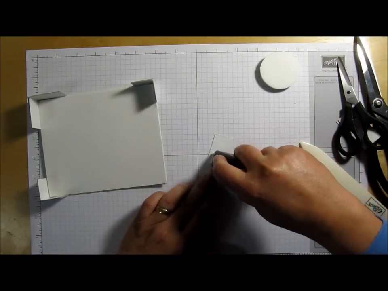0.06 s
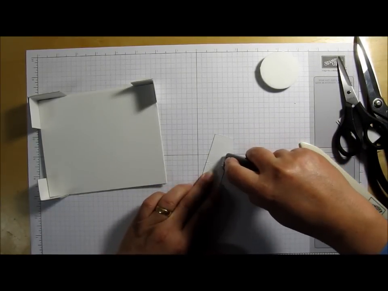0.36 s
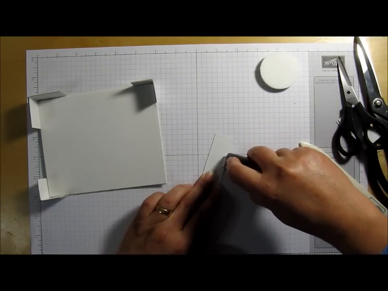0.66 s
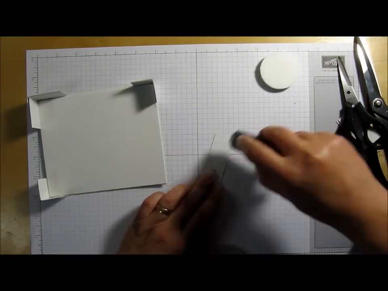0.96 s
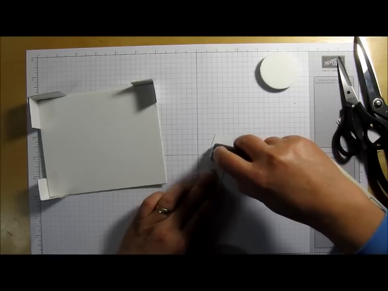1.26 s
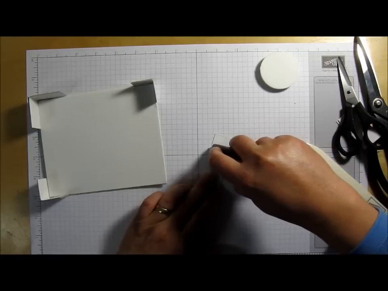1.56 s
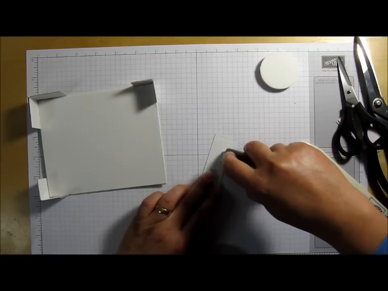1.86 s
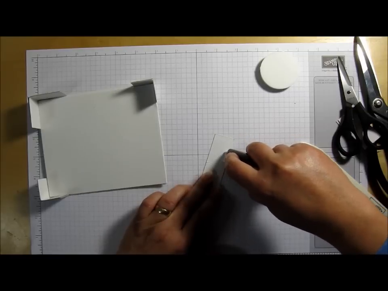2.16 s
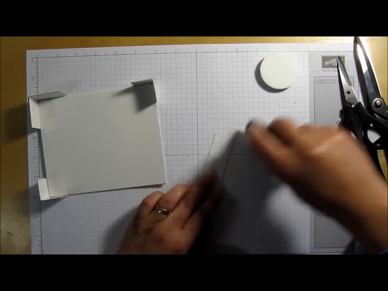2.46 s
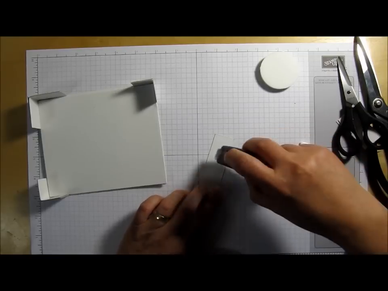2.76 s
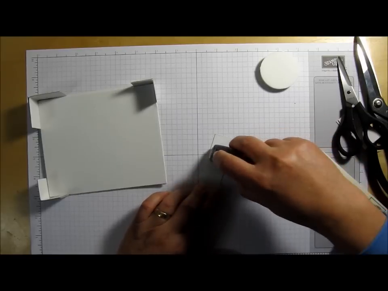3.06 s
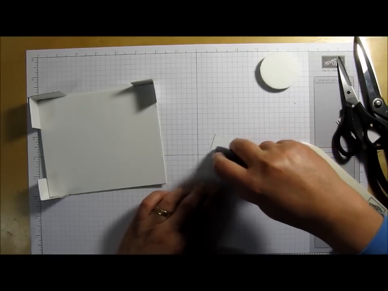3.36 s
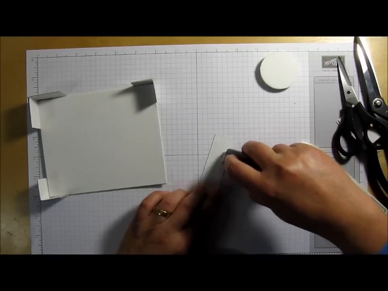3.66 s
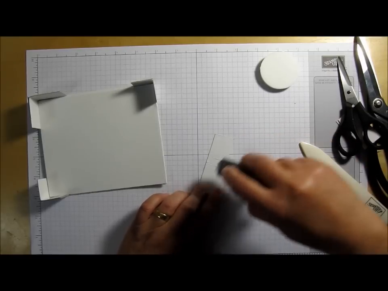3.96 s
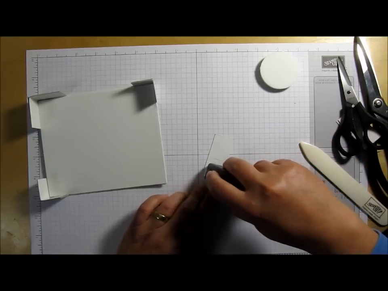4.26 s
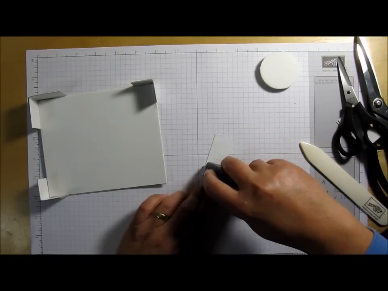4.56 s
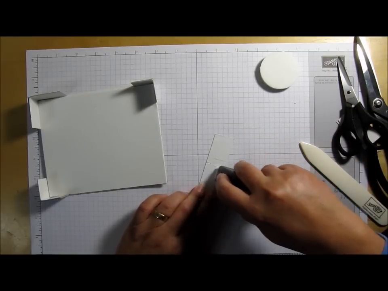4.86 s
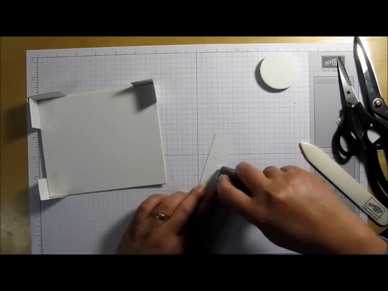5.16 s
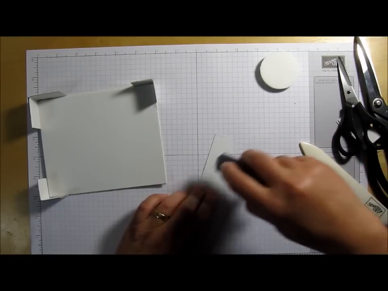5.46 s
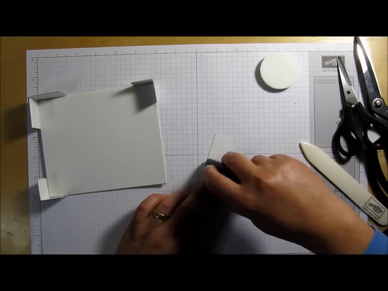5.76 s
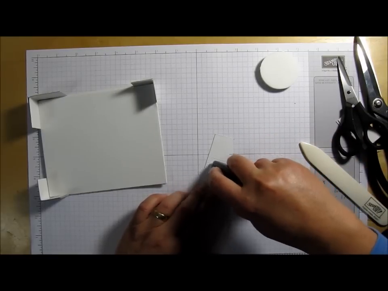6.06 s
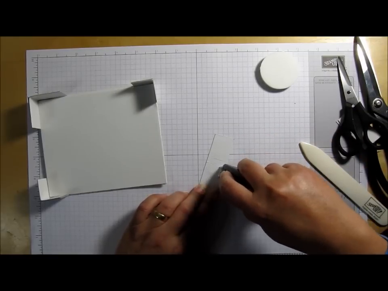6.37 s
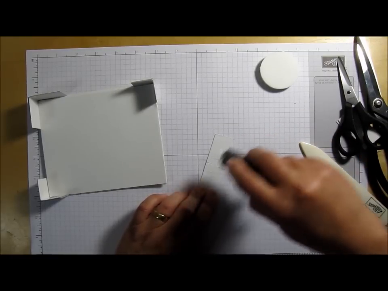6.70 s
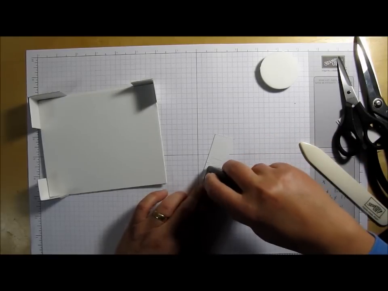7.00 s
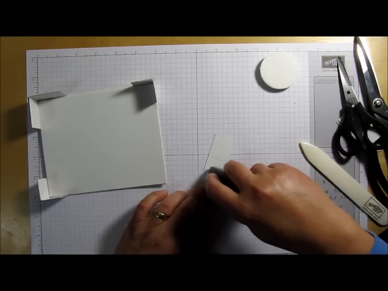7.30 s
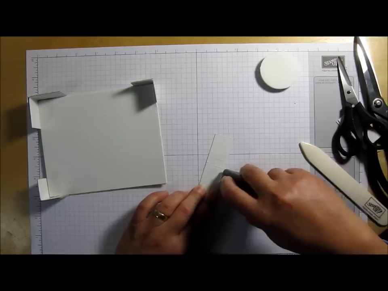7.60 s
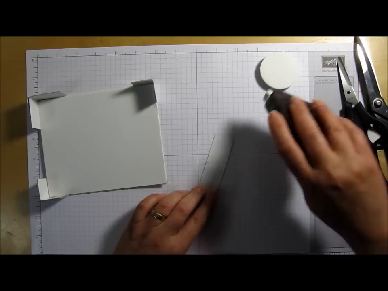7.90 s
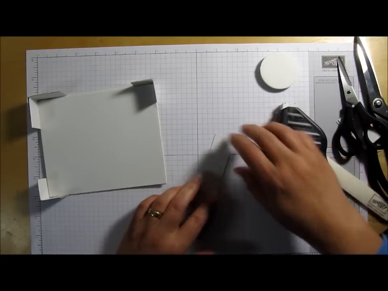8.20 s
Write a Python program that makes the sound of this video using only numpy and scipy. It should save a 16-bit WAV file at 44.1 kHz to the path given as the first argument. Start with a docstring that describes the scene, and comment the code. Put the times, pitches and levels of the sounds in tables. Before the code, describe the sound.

Close, dry plastic clicks and hollow snaps come from a tape runner drawn over card in short, faintly crackling strokes. Dull desk thumps mark the presses, and the ratcheting of the gears grows busier in the second half, after something creaks briefly on the mat. Finally the runner knocks down among tools with a short rattle. A small room with faint rumble and hiss lies underneath.

```python
"""In a small, quiet room a plastic tape runner is drawn over folded cardstock: glue crackles off the
roller, the gears tick, and the hollow shell knocks as the tape snaps. Again and again it is pressed down,
thumping the desk through the mat, drawn along and snapped off. Near 3 s hard tools are jostled; just
after 4 s something dragged on the mat creaks by stick-slip. At 8.1 s the runner is put down, and it
clatters against the tools. Each contact is a brief force filtered by the resonances of the struck body."""
import sys
import numpy as np
from scipy import signal
from scipy.fft import rfft, irfft
from scipy.io import wavfile
from scipy.ndimage import uniform_filter1d

SR = 44100
rng = np.random.default_rng(int(sys.argv[2]) if len(sys.argv) > 2 else 0)


def dump(signal):
    """Clip the signal to [-1, 1] and save it as 16-bit WAV at the path in sys.argv[1]."""
    limited = np.clip(np.atleast_2d(signal).T, -1, 1)
    pcm = np.round(limited * 32767).astype(np.int16)
    wavfile.write(sys.argv[1], SR, pcm)


N = 367838
SIZE = 24576  # samples in one event
HZ = np.fft.rfftfreq(SIZE, 1 / SR)
T = np.arange(SIZE) / SR

# low, mid and treble bands: lower f/Hz, upper f/Hz
BANDS = [(300, 1200), (1200, 4500), (4500, 16000)]
# gear resonances: f/Hz, width/Hz, height/dB
GEAR_MODES = [(610, 65, 11.5), (1980, 190, 13.5), (2390, 100, 10), (3197, 134, 9.5), (3594, 110, 8.5),
              (5100, 230, 5), (6510, 770, 5), (7970, 110, 9), (11950, 4500, 4.5)]
# presses into the desk: t/s, weight/dB, tilt per band/dB, click of the tip/dB
PRESSES = [(1.45, -42.5, -13, -83), (1.558, -39, 1.5, -58), (1.604, -38, -1, -57),
           (2.836, -33.5, -2.5, -40.5), (2.926, -43, 2, -45), (3.223, -36, -4.5, -48.5),
           (3.292, -40.5, -1.5, -63), (3.325, -47, 2.5, -62), (3.342, -38.5, 1, -65),
           (3.814, -39.5, -3, -43), (4.419, -42.5, -9, -62), (5.872, -39, -15, -75),
           (6.013, -37, -2, -54.5), (7.11, -36, -12.5, -54.5), (7.256, -37, 0.5, -46),
           (7.325, -39, -2, -55), (7.465, -35, -10.5, -51), (7.657, -37, 2.5, -43), (8.147, -30.5, 5, -60),
           (8.166, -33.5, 0.5, -60)]
# strokes over the card: start t/s, end t/s, crackle/dB, treble re crackle/dB, ratchet/dB
STROKES = [(0.061, 0.419, -63, -4, -64), (1.777, 2.028, -58.5, -4, -57.5), (2.521, 2.716, -64, -1, -61.5),
           (2.739, 2.827, -59.5, -3, -68), (3.441, 3.687, -59, -4.5, -58), (3.806, 3.906, -58.5, -7, -56),
           (4.899, 5.059, -59.5, 4, -43.5), (5.336, 5.534, -62.5, 1, -63),
           (6.081, 6.473, -63.5, 1.5, -51.5), (6.554, 6.688, -60.5, -14, -61), (7.387, 7.58, -58, 2, -48),
           (7.746, 7.774, -58, 10.5, -65), (7.88, 8.058, -62.5, -7.5, -77)]
# tape tears: t/s, mid level/dB, low re mid/dB, treble re mid/dB, rattle/s, desk recoil/dB, spool tick/dB
SNAPS = [(0.8883, -27, -1, -8.5, 0.0048, -49, -48), (2.5574, -36, 3.5, -7, 0.008, -38, -58.5),
         (3.8597, -34.5, -2.5, -6, 0.007, -38.5, -53.5), (5.3943, -34.5, -2.5, -8, 0.017, -37, -58.5),
         (6.6754, -26.5, -0.5, -9, 0.0055, -37, -54), (7.771, -25.5, 0.5, -5.5, 0.0028, -57, -68)]


def amp(db):
    """Amplitude ratio of a level in decibels."""
    return 10 ** (np.asarray(db) / 20)


def unit(x):
    """Normalisation to a mean energy of 1 per channel."""
    return x / np.sqrt(np.sum(np.atleast_2d(x) ** 2, axis=1).mean() + 1e-20)


def curve(points, hz):
    """Interpolation of (f/Hz, value) points on a logarithmic frequency axis."""
    f, value = np.transpose(points)
    return np.interp(np.log(hz + 1), np.log(f + 1), value)


def add(mix, t, sound):
    """Superposition: a stereo sound joins the mix at time t."""
    part = mix[:, max(0, round(t * SR)):][:, :sound.shape[1]]
    part += sound[:, :part.shape[1]]


def waveform(spectrum):
    """Inverse Fourier transform, faded over its last tenth."""
    return irfft(spectrum) * np.minimum(10 * (1 - T / T[-1]), 1)


def minimum_phase(db):
    """Causality: the phase follows from the log gain by a Hilbert transform."""
    log_gain = np.log(amp(np.r_[db, db[-2:0:-1]]))
    return np.exp(np.conj(signal.hilbert(log_gain)))[:len(db)]


def body(colour, modes):
    """Resonance: Lorentzian peaks stand on a smooth frequency response."""
    peaks = sum(amp(db) ** 2 / (1 + (2 * (HZ - hz) / width) ** 2) for hz, width, db in modes)
    return minimum_phase(curve(colour, HZ) + 10 * np.log10(1 + peaks))


def stereo(spectra, coherence, hz):
    """Partial coherence: two independent spectra mix as mid and side at two close microphones."""
    # channel balance: f/Hz, right re left/dB
    balance = [(100, 1.8), (600, 0.9), (1200, 1.4), (2300, 2.5), (4500, -0.2), (14000, 0)]
    alike = np.clip(curve(coherence, hz), -1, 1)
    mid, side = spectra[0] * np.sqrt((1 + alike) / 2), spectra[1] * np.sqrt((1 - alike) / 2)
    lean = amp(curve(balance, hz) / 2)
    return np.array([(mid + side) / lean, (mid - side) * lean])


def equalise(spectrum, bands, levels_db, seconds):
    """Spectral shaping: a waveform whose band energies, spread over `seconds`, approach levels_db."""
    centres = np.sqrt(np.prod(bands, axis=1))
    for _ in range(2):
        power = abs(spectrum.mean(0)) ** 2 * 2 / (SIZE * SR * seconds)
        band_power = np.array([power[(HZ > lo) & (HZ < hi)].sum() for lo, hi in bands])
        change_db = levels_db - 10 * np.log10(band_power + 1e-20)
        # a soft contact keeps falling above the last band
        top_db = change_db[-1] + 0.55 * min(change_db[-1] - change_db[-2], 1)
        tilt = np.c_[np.r_[centres, 2 * centres[-1]], np.r_[change_db, top_db]]
        spectrum = spectrum * minimum_phase(curve(tilt, HZ))
    return waveform(spectrum)


def room_noise():
    """Ambient noise: a steady low rumble and faint hiss, less coherent towards the treble."""
    # noise spectrum: f/Hz, relative density/dB
    density = [(8.8, -42), (15, -0.5), (32, -2.5), (49, -14.5), (101, -14.5), (157, -25), (204, -19),
               (237, -32.5), (282, -22), (479, -32.5), (523, -29), (968, -33.5), (7770, -43.5),
               (15300, -51.5), (16700, -75)]
    # likeness of left and right: f/Hz, coherence
    coherence = [(50, 0.95), (300, 0.46), (1000, 0.17), (3000, 0.18), (12000, 0.088)]
    hz = np.fft.rfftfreq(N, 1 / SR)
    white = stereo(rfft(rng.standard_normal((2, N))), coherence, hz)
    return amp(-52.5) * np.sqrt(N) * unit(irfft(white * amp(curve(density, hz)), N))


def room_tails(count=12):
    """Reverberation: diffuse noise decays exponentially, the treble first."""
    # reverberation time: f/Hz, T60/s
    t60 = [(100, 0.35), (500, 0.16), (2000, 0.13), (6000, 0.12), (15000, 0.088)]
    hz, t, noise = signal.stft(rng.standard_normal((count, 2, SIZE)), SR, nperseg=256)
    decay = amp(-60 * t / curve(t60, hz)[:, None])
    tails = signal.istft(noise * decay, SR, nperseg=256)[1][..., :SIZE]
    return [unit(tail * (1 - np.exp(-T / 0.0019))) for tail in tails]


def contact(tails, ring_s, room_db, crack):
    """Impulse response of one contact, as a spectrum: a crack, dense decaying modes, then the room."""
    # likeness of left and right: f/Hz, coherence
    coherence = [(100, 0.98), (600, 0.98), (1200, 0.86), (2200, 0.61), (4500, 0.39), (8000, 0.46),
                 (14000, 0.35)]
    edge_noise, ring_noise = rng.standard_normal((2, 2, SIZE))
    edge = unit(edge_noise * np.exp(-T / 0.00083))
    edge[0] = T == 0  # head on, the crack is a single impulse
    direct = unit(crack * edge + unit(ring_noise * np.exp(-T / ring_s)))
    reverberant = amp(room_db) * tails[rng.integers(len(tails))]
    return stereo(rfft(direct + reverberant), coherence, HZ)


def impacts(rows, modes, tails, room_db, crack_s):
    """Impact excitation of hard plastic: the shorter the rattle, the harder the crack."""
    # smooth response of the plastic: f/Hz, gain/dB
    colour = [(60, -9.5), (250, -15.5), (450, -9), (2200, 3.5), (3000, -5), (5000, -6.5), (7500, -10.5),
              (9000, -16.5), (16000, -25)]
    out, plastic = np.zeros((2, N)), body(colour, modes)
    for t, *levels_db, rattle_s in rows:
        spectrum = plastic * contact(tails, rattle_s, room_db, crack=crack_s / rattle_s)
        add(out, t, equalise(spectrum, BANDS, np.array(levels_db), seconds=0.011))
    return out


def slip_train(rates, jitter, spread_db):
    """Relaxation oscillation: one impulse of random size per cycle of a wavering rate."""
    waver = 10 * uniform_filter1d(rng.standard_normal(SIZE), 100)
    cycles = np.cumsum(rates * np.exp(jitter * waver)) / SR
    sizes = amp(spread_db * np.minimum(rng.exponential(1, SIZE), 4))
    return unit(np.diff(np.floor(cycles), prepend=0) * sizes)


def hand_force(start, end, exponent):
    """Normal force rises and falls in an arch; returns progress (0 to 1) and force."""
    along = np.minimum(T / (end - start), 1)
    return along, abs(np.sin(np.pi * along)) ** exponent


def mat_creaks(tails):
    """Stick-slip friction: a hand or the card drags on the mat, its pitch following the slip rate."""
    # drags: start t/s, end t/s, first slip rate/Hz, last slip rate/Hz, level/dB, cut-off f/Hz
    drags = [(4.279, 4.363, 715, 256, -43.5, 7000), (4.397, 4.467, 217, 112, -48.5, 7000),
             (8.085, 8.111, 175, 235, -35, 255), (8.129, 8.143, 220, 380, -37, 300)]
    # response of the mat: f/Hz, gain/dB
    colour = [(60, -13.5), (200, 1.5), (600, -4), (1250, 1), (2400, -8), (3700, -1), (5500, -8.5),
              (8000, -5.5), (12000, -10.5), (16000, -14)]
    out, mat = np.zeros((2, N)), minimum_phase(curve(colour, HZ))
    for start, end, first_rate, last_rate, level_db, soft_hz in drags:
        along, force = hand_force(start, end, exponent=0.67)
        slips = slip_train(first_rate * (last_rate / first_rate) ** along, jitter=0.054, spread_db=2)
        drive = (slips + 0.53 * unit(rng.standard_normal(SIZE))) * force
        softness = 1 / (1 + 1j * HZ / soft_hz) / (1 + 1j * HZ / (4 * soft_hz))
        response = mat * softness * contact(tails, ring_s=0.0025, room_db=-4.5, crack=0.83)
        creak = unit(waveform(rfft(drive) * response))
        add(out, start, amp(level_db) * np.sqrt((end - start) * SR) * creak)
    return out


def tool_clatter(tails):
    """Collisions excite the modes of hard tools jostled on the desk."""
    # collisions, before the gain below: t/s, low/dB, mid/dB, treble/dB, rattle/s
    collisions = [(2.9245, -38.5, -38, -40, 0.013), (8.2234, -32.5, -22.5, -42, 0.0071),
                  (8.2395, -28, -37, -43, 0.008), (8.2538, -37, -35, -44, 0.0086),
                  (8.275, -39, -38.5, -50, 0.035), (8.3099, -31.5, -34, -51, 0.0054),
                  (8.3232, -33, -30, -42, 0.02)]
    # tool resonances: f/Hz, width/Hz, height/dB
    modes = [(469, 40, 10), (580, 29, 12), (847, 22, 12), (1095, 170, 11.5), (1300, 28, 9), (1768, 35, 12),
             (1970, 55, 8), (2210, 40, 5), (2890, 60, 8), (3160, 230, 11.5), (3930, 310, 10),
             (4970, 39, -8)]
    return amp(2) * impacts(collisions, modes, tails, room_db=-2.5, crack_s=0.0014)


def desk_thumps(tails):
    """Plate modes boom under the soft mat at each press and recoil; harder contacts reach higher."""
    # smooth response of the desk: f/Hz, gain/dB
    colour = [(20, -15), (60, 12.5), (130, 2), (450, -3), (750, -19), (1300, -24), (3000, -26.5),
              (8000, -51.5)]
    # desk resonances: f/Hz, width/Hz, height/dB
    modes = [(87.8, 6.8, 24), (202.5, 41, 22.8), (310, 19.3, 23), (424, 18, 10.8), (494, 64, 6.4),
             (614, 30, 6.3)]
    # bands of a thump: lower f/Hz, upper f/Hz
    bands = [(60, 130), (130, 380), (380, 1200)]
    out, desk = np.zeros((2, N)), body(colour, modes)
    recoils = [(t, recoil_db, -5.5) for t, *_, recoil_db, _ in SNAPS]
    for t, weight_db, tilt_db, *_ in list(PRESSES) + recoils:
        spectrum = desk * contact(tails, ring_s=0.0095, room_db=-8.5, crack=0.59)
        add(out, t, equalise(spectrum, bands, weight_db + tilt_db * np.arange(3), seconds=0.0082))
    return amp(-1) * out


def roller_crackle(tails, threads_per_s=1100, slowing=0.45):
    """Adhesive peeling: glue threads tear off the roller, ever more slowly along each stroke."""
    # smooth response of the card: f/Hz, gain/dB
    colour = [(60, -18), (300, 8.5), (1200, -1), (2000, -13), (4000, -12), (7500, -15), (11000, -16),
              (16000, -15)]
    out, card = np.zeros((2, N)), body(colour, GEAR_MODES)
    for start, end, db, bright_db, _ in STROKES:
        along, force = hand_force(start, end, exponent=0.17)
        crackle = slip_train(threads_per_s * (1 - slowing * along), jitter=0.45, spread_db=9.5)
        drive = (crackle + 0.35 * unit(rng.standard_normal(SIZE))) * force
        spectrum = card * rfft(drive) * contact(tails, ring_s=0.004, room_db=-3.5, crack=1.13)
        add(out, start, equalise(spectrum, BANDS, db + np.array([-4.5, 0, bright_db]), end - start))
    return out


def spool_ring(uneven_db=4, detune=0.027):
    """Spectrum of the spool's damped modes: the grip detunes them and each blow weights them anew."""
    # spool modes: f/Hz, relative level/dB, T60/s
    modes = [(596.5, -8, 0.09), (1963, -11.5, 0.054), (2174, -3.5, 0.036), (3244, -4.5, 0.029),
             (3547, -2, 0.015)]
    draws = rng.standard_normal((len(modes), 2))
    partials = [amp(db + uneven_db * share - 60 * T / t60)
                * np.sin(2 * np.pi * hz * (1 + detune * grip) * T)
                for (share, grip), (hz, db, t60) in zip(draws, modes)]
    return rfft(unit(sum(partials)))


def ratchet_teeth(teeth_per_s=34, jitter=0.3, spread_db=4.5):
    """Quasi-periodic tooth impacts, loudest where the hand bears down: t/s, mid/dB, treble/dB."""
    rows = []
    for start, end, _, _, tooth_db in STROKES:
        for tooth, (late, strong, bright) in enumerate(rng.standard_normal((24, 3))):
            t = start + (tooth + 0.5 + jitter * late) / teeth_per_s
            if start < t < end:
                force = np.sin(np.pi * (t - start) / (end - start))
                db = tooth_db + spread_db * strong + 10 * np.log10(force)
                rows.append((t, db, db + 1 + spread_db * bright))
    return rows


def mechanism_ticks(tails, settle_s=0.08):
    """Transient excitation: tiny clicks ring the gears; the dull ones ring the spool most."""
    # prominent clicks of gears and spool: t/s, mid/dB, treble/dB
    clicks = [(0.0519, -51, -55.5), (0.0944, -46, -50.5), (0.225, -50, -46.5), (0.374, -54.5, -52),
              (0.5062, -60.5, -56.5), (0.7831, -46.5, -44.5), (0.8342, -45.5, -47.5),
              (1.0362, -51.5, -50.5), (1.8869, -39, -60), (1.894, -32.5, -38.5), (2.0024, -53, -44.5),
              (2.3389, -50, -46.5), (2.5323, -44.5, -47), (2.5669, -67, -36.5), (3.1212, -49.5, -57),
              (4.1433, -61, -55), (4.3771, -50, -49.5), (4.401, -48.5, -50), (4.5209, -50, -57),
              (4.5827, -52, -56.5), (4.8663, -39.5, -50), (4.9097, -38, -39), (4.943, -38.5, -35),
              (5.0123, -42, -40), (5.0409, -69, -45.5), (5.2245, -52.5, -45), (5.3527, -39, -43.5),
              (5.4095, -40, -34), (6.1252, -38.5, -43.5), (6.1586, -51, -39), (6.2165, -51, -39),
              (6.2876, -49, -40), (6.3618, -46, -41), (6.3739, -52, -44), (6.4223, -53, -44.5),
              (6.4896, -61, -51.5), (6.5672, -50.5, -43), (6.6448, -44.5, -43), (7.1532, -60, -49.5),
              (7.407, -48, -52.5), (7.4345, -35.5, -58), (7.469, -38.5, -35.5), (7.4789, -31, -33.5),
              (7.5105, -31, -35.5), (7.5402, -57, -41), (7.6055, -48.5, -41)]
    tip_clicks = [(t, db, db - 2) for t, *_, db in PRESSES]
    settling = [(t + settle_s, db, db + 1.5) for t, *_, db in SNAPS]  # the slack spool drops back
    out, gears = np.zeros((2, N)), None
    # smooth response of the gears: f/Hz, gain/dB
    colour = [(60, -37), (300, -43.5), (1200, -6.5), (2000, -7.5), (4000, -0.5), (7500, -1), (9000, -6.5),
              (16000, -11.5)]
    gears = body(colour, GEAR_MODES)
    for t, mid_db, treble_db in list(clicks) + tip_clicks + settling + ratchet_teeth():
        click = gears * contact(tails, ring_s=0.0015, room_db=-6, crack=0.8)
        ring = spool_ring() * contact(tails, ring_s=0.00022, room_db=-12.5, crack=1.53)
        ring_db = 1 + 0.58 * np.clip(mid_db - treble_db - 13, -20, 5)
        levels_db = np.array([mid_db - 11, mid_db, treble_db])
        add(out, t, equalise(click + amp(ring_db) * ring, BANDS, levels_db, seconds=0.0082))
    return out


def shell_knocks(tails, yield_s=0.0035, rebound_s=0.012):
    """The hollow shell resonates when the roller drags, when it is set down and when the tape tears."""
    # groans of the dragging roller: t/s, low level/dB
    groans = [(1.9096, -37.5), (3.547, -45)]
    # the shell is set down: t/s, low and mid level/dB, treble re mid/dB, rattle/s
    landings = [(3.016, -47.5, -18, 0.0023), (4.7445, -24.5, -17, 0.0028), (8.101, -40, -24, 0.003),
                (8.1346, -39.5, -13, 0.0018), (8.146, -22, -7, 0.0035), (8.1595, -28.5, -7, 0.0039)]
    # shell resonances: f/Hz, width/Hz, height/dB
    modes = [(311, 20, 13), (547, 27, -2), (577.4, 72, 25), (830, 61, 10), (1132, 34, 12.5),
             (1230, 130, 11), (1453, 25, 8), (1803, 49, 9), (2092, 144, 8), (2460, 62, 3), (3330, 850, 5.5),
             (4110, 95, -6)]
    # blows, before the gain below: t/s, low/dB, mid/dB, treble/dB, rattle/s
    blows = [(t, db, db - 28, db - 8, 0.01) for t, db in groans]
    blows += [(t, db, db, db + bright_db, rattle_s) for t, db, bright_db, rattle_s in landings]
    for t, db, low_db, bright_db, rattle_s, *_ in SNAPS:
        levels_db = db + np.array([low_db, 0, bright_db])
        blows += [(t - yield_s, *(levels_db + (-23, -18.5, -9.5)), 0.0051),  # the tape starts to give
                  (t, *levels_db, rattle_s),  # it tears
                  (t + rebound_s, *(levels_db + (-15, -13, -5.5)), 0.011)]  # the shell rebounds
    return amp(-0.5) * impacts(blows, modes, tails, room_db=-10, crack_s=0.0012)


def scene():
    """Superposition of runner, card, tools and desk in one reverberant room."""
    tails = room_tails()
    knocks = shell_knocks(tails) + tool_clatter(tails) + desk_thumps(tails)
    friction = roller_crackle(tails) + mat_creaks(tails)
    return knocks + friction + room_noise() + mechanism_ticks(tails)


def record(dry):
    """Band limiting: a linear-phase low-pass at 16.1 kHz."""
    low_pass = signal.firwin(255, 16100, window=("kaiser", 8), fs=SR)
    return signal.oaconvolve(dry, low_pass[None], "same", axes=1)


dry = scene()
out = record(dry)
dump(out)
```